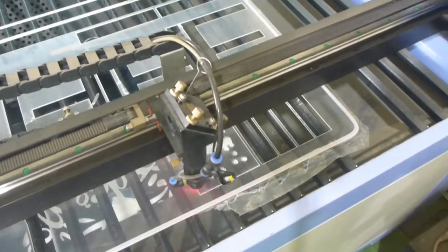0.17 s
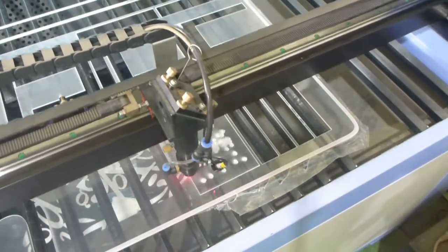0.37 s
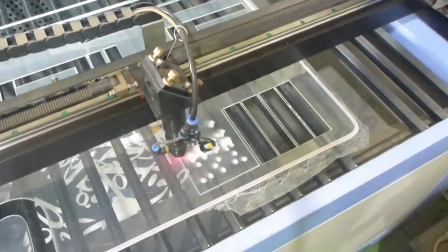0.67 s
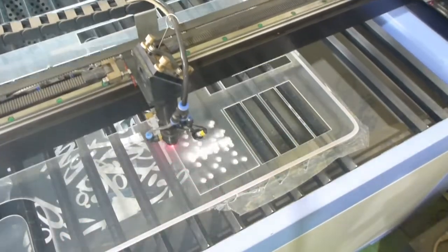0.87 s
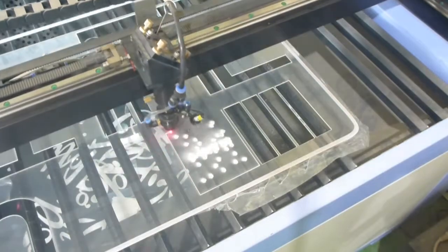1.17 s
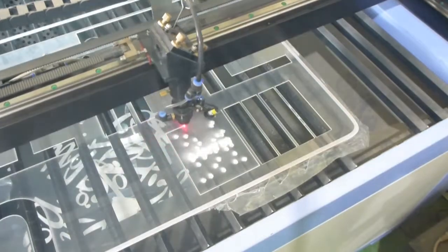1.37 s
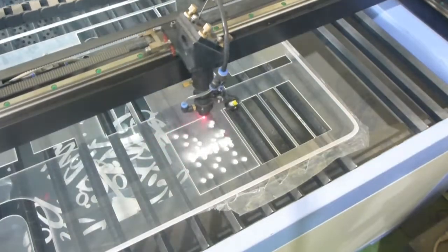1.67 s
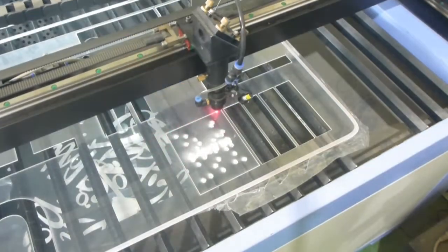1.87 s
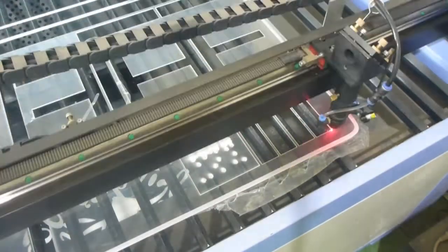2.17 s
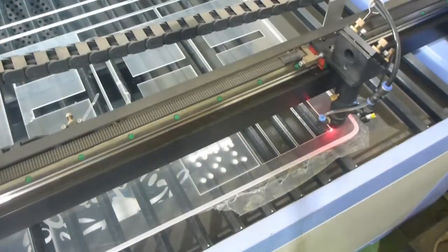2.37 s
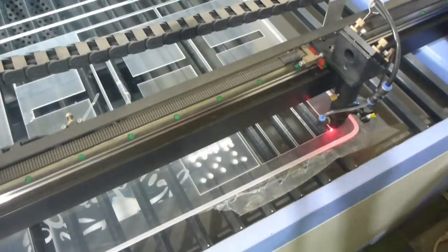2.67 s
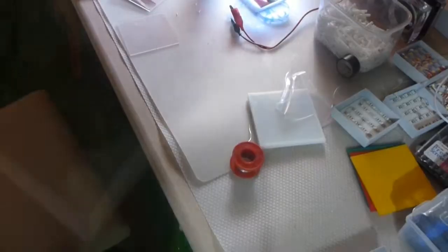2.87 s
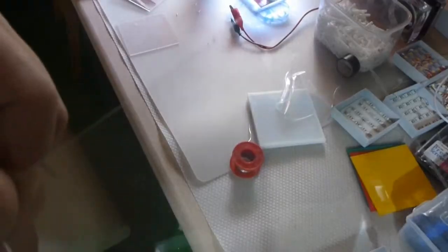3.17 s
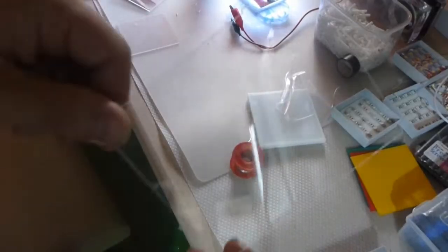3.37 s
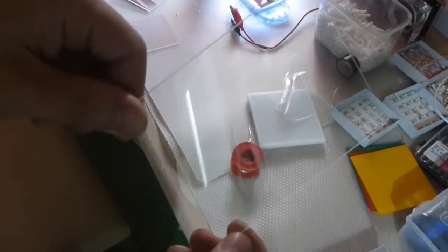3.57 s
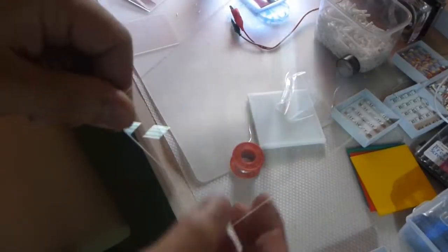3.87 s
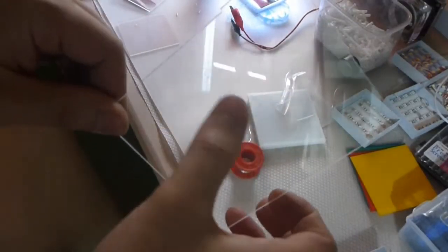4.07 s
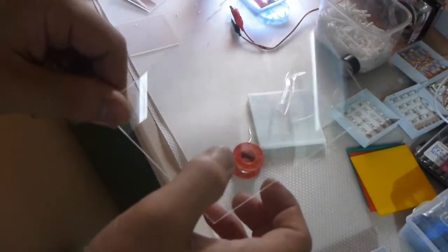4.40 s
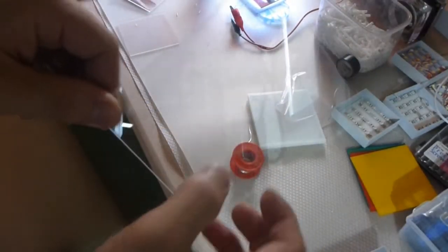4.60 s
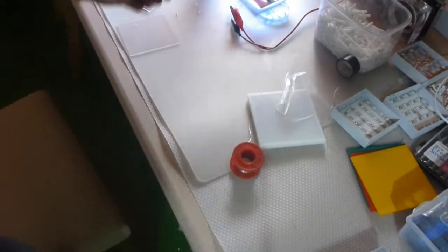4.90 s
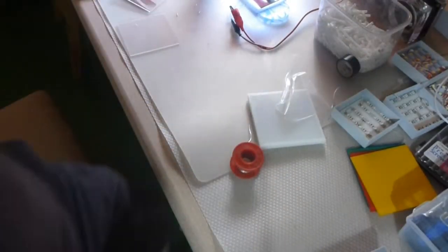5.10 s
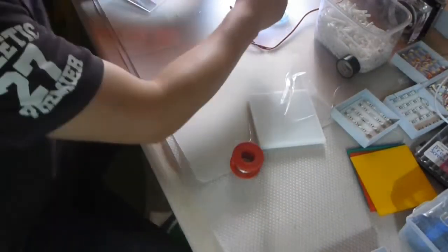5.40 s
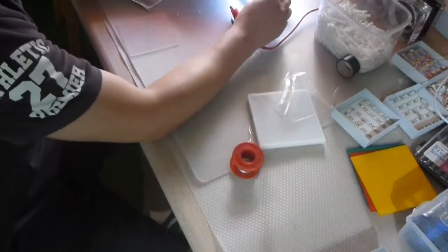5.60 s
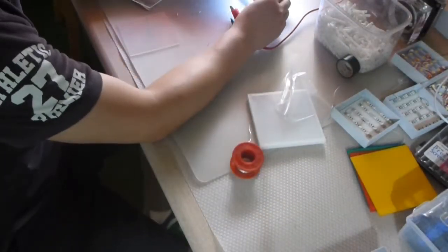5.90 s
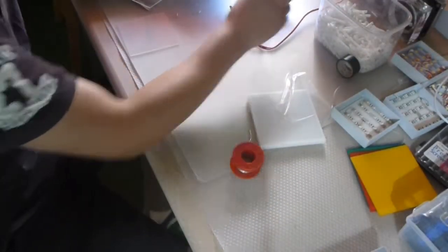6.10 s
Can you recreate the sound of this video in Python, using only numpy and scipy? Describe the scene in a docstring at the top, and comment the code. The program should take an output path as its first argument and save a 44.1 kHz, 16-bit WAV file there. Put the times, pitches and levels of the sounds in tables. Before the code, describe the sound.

A laser cutter runs close to the microphone, with rushing extraction air, a steady motor whine and humming fans. A few short, high chirps sound before it cuts off abruptly. After an instant of silence comes a much quieter workroom, where a vehicle drones past outside and fades. Sleeves rustle faintly, a chair squeaks, and a quick cluster of sharp knocks hits the desk.

```python
"""A laser cutter at work, heard close: extraction air roars in the cabinet, a motor whines, two fans sing
their blade tones. A faint high whistle passes, then come short drive chirps and a low hum. The head runs
off and uncovers the bed; air and fans come up. After a short silence, a quiet workroom: a vehicle drones
past outside and fades, with distant hums and faint whistles. Sleeves rustle, something small taps the
desk, a chair joint squeaks by stick-slip, then harder knocks ring the desk's modes."""
import sys
import numpy as np
from scipy import signal
from scipy.fft import rfft, irfft
from scipy.io import wavfile
from scipy.ndimage import uniform_filter1d

SR = 44100
rng = np.random.default_rng(int(sys.argv[2]) if len(sys.argv) > 2 else 0)


def inscribe(sig):
    """Save sig as 16-bit PCM at rate SR to the path in sys.argv[1].

    A 1-D sig is mono; a 2-D sig holds one channel per row.
    Samples are clipped to [-1, 1] before scaling.
    """
    pcm = np.round(np.clip(np.atleast_2d(sig).T, -1, 1) * 32767)
    wavfile.write(sys.argv[1], SR, pcm.astype(np.int16))


N = 275625
T = np.arange(N) / SR
HZ = np.arange(1, N // 2 + 2) * SR / N


def undb(db):
    return 10 ** (np.asarray(db) / 20)


def at_rms(x, db):
    return x * undb(db) / np.sqrt(np.mean(x ** 2))


def gate(start_s, end_s, fade_s):
    return np.clip(np.minimum(T - start_s, end_s - T) / fade_s + .5, 0, 1)


def curves(table):
    """Columns interpolated over time, then a gate shut outside the table."""
    times_s, *columns = np.transpose(table)
    return [np.interp(T, times_s, c) for c in columns] + [gate(times_s[0], times_s[-1], .01)]


def walk(rate_hz):
    """Random steps, smoothed twice; spread near 1."""
    hold = int(SR / rate_hz)
    steps = np.repeat(rng.standard_normal(N // hold + 1), hold)
    return 1.3 * uniform_filter1d(uniform_filter1d(steps, hold), hold)[:N]


def hump(hz, width_hz):
    """Resonance curve, 1 at the centre."""
    return 1 / (1 + (2 * (HZ - hz) / width_hz) ** 2)


def spectrum_db(points):
    hz, db = np.transpose(points)
    return np.interp(np.log(HZ), np.log(hz), db, left=-120, right=-120)


def noise(gain):
    return at_rms(irfft(gain * rfft(rng.standard_normal(N)), N), 0)


def living_noise(colour_db, swell_db, flicker_db, treble_db=0):
    """Octave bands that swell together and flicker alone."""
    spectrum = undb(colour_db) * rfft(rng.standard_normal(N))
    common_db = swell_db * walk(4.995)
    out = 0
    for octave in range(-5, 5):
        share = np.clip(1 - np.abs(np.log2(HZ / 1000) - octave), 0, 1)
        band_db = common_db + flicker_db * walk(9) + (octave >= 3) * treble_db
        out += irfft(spectrum * share, N) * undb(band_db)
    return out


def tone(hz, orders, waver_db, drift=0):
    """Harmonics of one drifting pitch, each wavering in level."""
    phase = 2 * np.pi * np.cumsum(hz * (1 + drift * walk(6))) / SR
    return sum(np.sqrt(2) * undb(db + waver_db * walk(12)) * np.sin(k * phase + 2 * np.pi * rng.random())
               for k, db in orders)


def gated_tones(table, fade_s):
    return sum(gate(start_s, end_s, fade_s) * tone(hz, [(1, db)], waver_db=1.5, drift=.0007)
               for start_s, end_s, hz, db in table)


# (frequency [Hz], relative density [dB])
AIR_SPECTRUM = [(59, -104), (100, -64), (223, -31), (884, -8), (962, -8), (1140, -13), (1410, -7.5),
                (1670, -8), (1780, -7.5), (1930, -9.5), (3080, -17), (3500, -14.5), (3810, -19),
                (4230, -17), (15700, -31)]
# Resonances and dead spots: (centre [Hz], width [Hz], lift [dB])
CABINET_MODES = [(533, 210, 5.5), (655, 40, -9.5), (752, 135, 3), (1420, 160, 2), (1866, 35, -8),
                 (2020, 110, 1), (2290, 260, 2.5), (2730, 60, -5.5), (3430, 290, 4.5), (4310, 410, 8.5),
                 (4950, 280, 5.5), (3800, 180, -2.5), (4600, 200, -3), (5520, 99, -3.5), (6130, 220, 1),
                 (6700, 190, -2.5), (5630, 150, 2), (8150, 350, 1.5)]

def extraction_air(uncovered):
    """Air rush coloured by the cabinet; rises as the bed is uncovered, the treble less."""
    colour_db = spectrum_db(AIR_SPECTRUM) + sum(db * hump(hz, width) for hz, width, db in CABINET_MODES)
    rush = living_noise(colour_db, swell_db=.4, flicker_db=.6, treble_db=-1.5 * uncovered)
    return undb(2 * uncovered) * at_rms(rush, -34.5)


# (time [s], pitch [Hz], level [dB])
MOTOR_TRACK = [(0.0, 1803.3, -33.3), (1.5, 1803.6, -34), (1.86, 1804, -33), (2.12, 1805, -35.5),
               (2.35, 1806, -32.3), (2.76, 1806, -33)]
# (multiple, relative level [dB])
MOTOR_OVERTONES = [(2, -16), (3, -28), (4, -34)]

def motor_whine():
    """Multiples of a near-steady rotation; the overtones waver most."""
    hz, db, _ = curves(MOTOR_TRACK)
    return undb(db) * (tone(hz, [(1, .0039)], waver_db=.63) + tone(hz, MOTOR_OVERTONES, waver_db=1.8))


# Blade harmonics: (multiple, relative level [dB])
FAN_A_ORDERS = [(2, 1), (3, -1), (4, -5), (5, -11), (6, -15)]
FAN_B_ORDERS = [(1, -14), (2, 1), (6, -15)]

def fans(uncovered, period_s=.536, crest_s=1.3):
    """Blade tones of two fans swell and sink; louder with the bed uncovered."""
    swell_db = 1.4 * np.cos(2 * np.pi * (T - crest_s) / period_s)
    fan_a = tone(hz=479.6, orders=FAN_A_ORDERS, waver_db=.93, drift=.00147)
    fan_b = tone(hz=494.1, orders=FAN_B_ORDERS, waver_db=1.53, drift=.001525)
    return undb(-47 + swell_db + 3.5 * uncovered) * (fan_a + fan_b)


# (pitch [Hz], level [dB])
MACHINE_TONES = [(226, -76), (681, -58), (1323, -56), (1948, -57), (2143, -57), (2620, -57), (2847, -59),
                 (3327, -61), (4059, -57), (4317, -59), (4538, -62), (5017, -60), (5599, -66), (6019, -67)]

def machine_tones():
    """Thin, wavering tones of the running machine."""
    return sum(tone(hz, [(1, db)], waver_db=3, drift=.001) for hz, db in MACHINE_TONES)


# (start [s], end [s], pitch [Hz], level [dB])
PASSING_TONES = [(2.045, 2.145, 1648, -33.5), (2.165, 2.2, 1690, -46), (2.02, 2.05, 9560, -55),
                 (2.225, 2.3, 9886, -47.5), (2.315, 2.385, 9886, -45), (2.4, 2.49, 9886, -47),
                 (2.52, 2.54, 9886, -58), (1.1, 1.55, 7730, -64), (2.2, 2.77, 205, -68)]

def passing_tones():
    """Short drive chirps, plus a faint high whistle and a low hum."""
    return gated_tones(PASSING_TONES, fade_s=.0099)


# (frequency [Hz], relative density [dB])
ROOM_SPECTRUM = [(15, -58), (25, -41), (189, -16), (222, -5.5), (254, -12.5), (307, -6.5), (381, -9),
                 (413, -3), (448, -3.5), (653, 0), (832, -1), (952, 1), (1280, -3), (1870, -4),
                 (15700, -21.5)]

def room_tone():
    """Soft, slightly flickering background noise."""
    return at_rms(living_noise(spectrum_db(ROOM_SPECTRUM), swell_db=.5, flicker_db=.7), -57)


# (time [s], level [dB])
TYRE_DRONE = [(2.84, -57), (3.05, -64.5), (3.26, -56), (3.38, -50.5), (3.48, -58.5), (3.69, -62.5),
              (3.8, -57.5), (4.0, -63), (4.3, -76)]
# (frequency [Hz], relative density [dB])
VEHICLE_HISS = [(710, 0), (1200, -2), (1570, -1), (1820, -15), (2540, -9), (4270, -3.5), (8720, -14),
                (11000, -30), (14300, -56), (22000, -120)]

def vehicle(pass_s=3.33, pass_length_s=.5, hiss_falls_s=3.44, fall_db_per_s=27):
    """A narrow tyre drone, lower and purer as it passes, over a broad hiss; both die away."""
    drone_db, audible = curves(TYRE_DRONE)
    near = np.exp(-(2 * (T - pass_s) / pass_length_s) ** 4)
    roughness = .93 - .38 * near
    tread = np.sqrt(2 - 2 * roughness ** 2) + roughness * (noise(hump(0, 120)) + 1j * noise(hump(0, 140)))
    drone_hz = (936 - 44.12 * near) * (1 + .0059 * walk(25))
    drone = np.real(tread * np.exp(2j * np.pi * np.cumsum(drone_hz) / SR))
    colour_db = spectrum_db(VEHICLE_HISS) + 4 * hump(3700, 300) + 4 * hump(4360, 400)
    hiss = at_rms(living_noise(colour_db, swell_db=.67, flicker_db=.52), -55)
    fall_db = fall_db_per_s * np.clip(T - hiss_falls_s, 0, None)
    return audible * (undb(drone_db) * drone + undb(-fall_db) * hiss)


# (start [s], end [s], pitch [Hz], level [dB])
DISTANT_HUMS = [(2.85, 3.6, 226, -79.5), (3.8, 4.4, 226, -76), (4.0, 4.4, 290, -74), (4.5, 6.3, 226, -81),
                (4.6, 4.85, 304, -80), (5.7, 6.3, 325, -74.5)]

def distant_hums():
    """Low tones that fade in and out."""
    return gated_tones(DISTANT_HUMS, fade_s=.09)


# (start [s], end [s], pitch [Hz], level [dB])
FAINT_WHISTLES = [(4.61, 4.70, 5600, -71.5), (3.56, 3.6, 2300, -64), (2.88, 3.05, 3760, -63),
                  (3.33, 3.39, 1125, -61), (6.0, 6.03, 1850, -63)]

def faint_whistles():
    """Brief, high, pure tones."""
    return gated_tones(FAINT_WHISTLES, fade_s=.026)


# (start [s], length [s], centre [Hz], level [dB])
SLEEVE_RUSTLES = [(3.137, .03, 6000, -61), (4.739, .011, 12000, -52), (4.743, 0.048, 7600, -60),
                  (4.862, .035, 4000, -60.5), (4.998, .04, 8500, -64), (5.082, 0.03, 9000, -58),
                  (5.107, .03, 12000, -58), (5.21, 0.066, 9000, -59), (5.242, 0.029, 2290, -54.5),
                  (5.256, 0.063, 8000, -57.5), (5.443, 0.039, 8000, -60.5), (5.474, 0.032, 10000, -62),
                  (6.02, .05, 4500, -64), (6.1, .25, 4950, -65)]

def sleeve_rustles():
    """Fibres slip in dense, uneven grains that set in fast and trail off."""
    grain = undb(2.5 * walk(300))
    out = 0
    for start_s, length_s, hz, db in SLEEVE_RUSTLES:
        progress = (T - start_s) / length_s
        envelope = np.clip(progress / .3, 0, 1) * np.exp(-3 * np.clip(progress - .6, 0, 50))
        low_cut = HZ / (HZ + hz / 2)
        out += undb(db) * envelope * noise(hump(hz, width_hz=1.3 * hz) * low_cut)
    return grain * out


# (time [s], peak [dB], contact low-pass [Hz])
DESK_KNOCKS = [(5.3572, -27, 4000), (5.3612, -28, 3000), (5.3665, -38, 4000), (5.515, -50, 700),
               (4.745, -50, 2500)]
# (frequency [Hz], relative level [dB], T60 [s])
DESK_MODES = [(430, -14, .03), (657, -3, .04), (800, -4, .03), (1087, -2, .04), (1180, -5, .02),
              (1314, 0, .03), (1669, -17, .06), (1895, -14, .04), (2083, -6, .045), (2374, -17, .04),
              (3058, -15, .02)]

def desk_knocks(contact_s=.00045):
    """Each blow rings the desk in its own mix of modes; a softer contact is duller."""
    t, out = T[:SR // 5], np.zeros(N)
    for start_s, peak_db, top_hz in DESK_KNOCKS:
        ring = 0
        for hz, db, t60_s in DESK_MODES:
            envelope = undb(db + 1.7 * rng.standard_normal() - 60 * t / t60_s)
            ring += envelope * np.sin(2 * np.pi * hz * t + rng.random())
        attack = 1 - np.exp(-t / contact_s)
        band = signal.butter(4, [350, top_hz], "band", fs=SR, output="sos")
        blow = signal.sosfilt(band, attack * ring)
        onset = int(start_s * SR)
        out[onset:onset + len(blow)] += undb(peak_db) * blow / np.abs(blow).max()
    return out


# (start [s], length [s], first rate [Hz], last rate [Hz], first level [dB], first overtone gain [dB])
CHAIR_SLIPS = [(4.899, .048, 545, 585, -50.5, -17), (4.944, .09, 490, 640, -51.5, -10.5),
               (5.087, .07, 665, 685, -64, -22)]
# (multiple, relative level [dB])
SQUEAK_OVERTONES = [(2, 2), (3, 2), (4, -4), (5, -9)]

def chair_squeak():
    """Stick-slip in a joint: each slip climbs in rate as it fades and dulls; the overtones flicker."""
    out = 0
    for start_s, length_s, first_hz, last_hz, db, bright_db in CHAIR_SLIPS:
        run_out = np.clip((T - start_s) / length_s, 0, 1) ** 3
        fade_db = 9 * run_out
        rate_hz = first_hz + (last_hz - first_hz) * run_out
        phase = 2 * np.pi * np.cumsum(rate_hz * (1 + .018 * walk(150))) / SR
        overtones = sum(undb(order_db + 3.5 * walk(60)) * np.sin(k * phase)
                        for k, order_db in SQUEAK_OVERTONES)
        envelope = gate(start_s, start_s + length_s, .009) * undb(db - fade_db + 2.2 * walk(80))
        out += np.sqrt(2) * envelope * (np.sin(phase) + undb(bright_db - fade_db) * overtones)
    return out


def chair_catch(start_s=4.928, decay_s=.016):
    """The joint catches between two slips: a short noise burst."""
    age = np.clip(T - start_s, 0, None) / decay_s
    envelope = np.clip(4 * age, 0, 1) * np.exp(-age)
    return undb(-46) * envelope * noise(hump(1750, width_hz=460))


def scene(cutter_end_s=2.762, room_start_s=2.8425):
    """Cutter, short silence, workroom; both channels alike."""
    uncovered = np.interp(T, [2.5, 2.61], [0, 1])  # the head moves off the bed
    cutter = extraction_air(uncovered) + motor_whine() + fans(uncovered) + machine_tones() + passing_tones()
    background = room_tone() + vehicle() + distant_hums() + faint_whistles()
    workroom = background + sleeve_rustles() + desk_knocks() + chair_squeak() + chair_catch()
    mono = (T < cutter_end_s) * cutter + (T > room_start_s) * workroom
    return np.array([mono, mono])


def record(dry, notch_hz=11600, notch_width_hz=560, top_hz=15700):
    """One microphone with a dead spot in the treble, then a steep low-pass."""
    notch = signal.iirnotch(notch_hz, notch_hz / notch_width_hz, fs=SR)
    notched = signal.lfilter(*notch, signal.lfilter(*notch, dry))
    return signal.sosfilt(signal.ellip(10, .2, 80, top_hz, fs=SR, output="sos"), notched)


dry = scene()
out = record(dry)
inscribe(out)
```